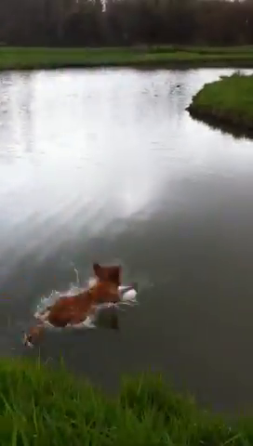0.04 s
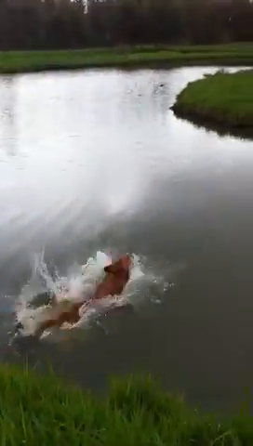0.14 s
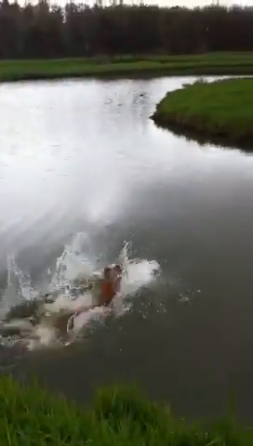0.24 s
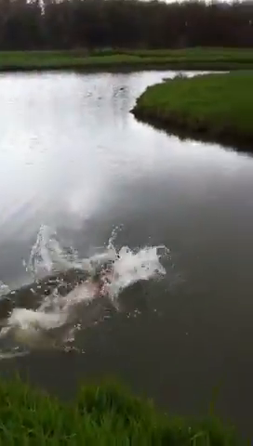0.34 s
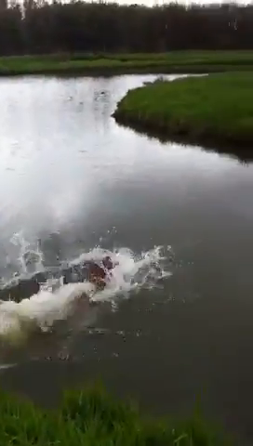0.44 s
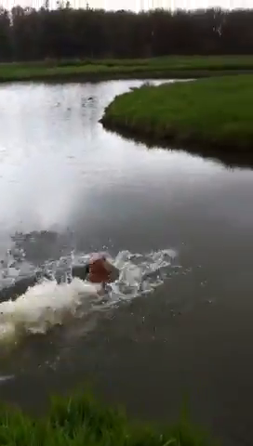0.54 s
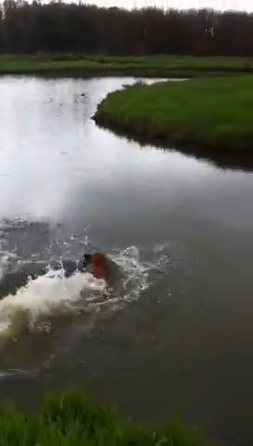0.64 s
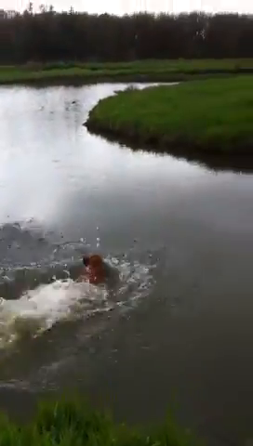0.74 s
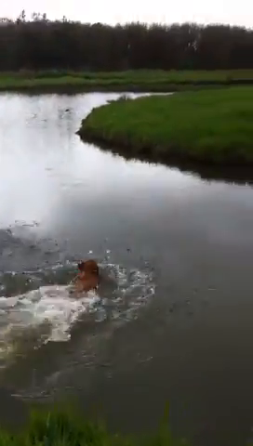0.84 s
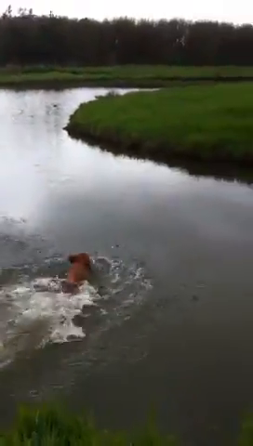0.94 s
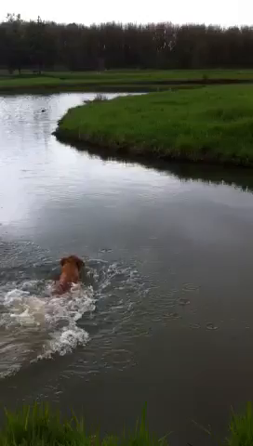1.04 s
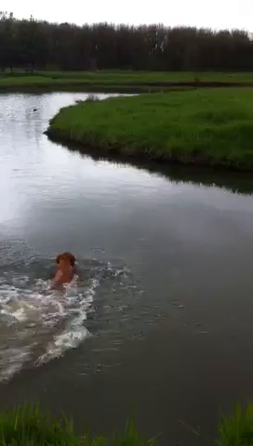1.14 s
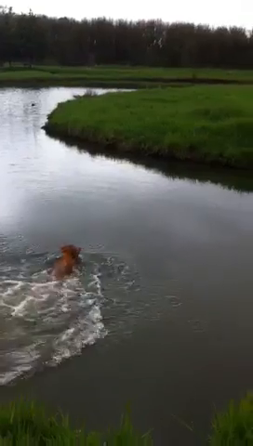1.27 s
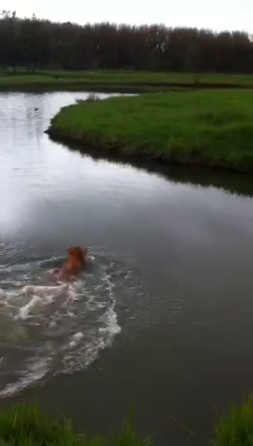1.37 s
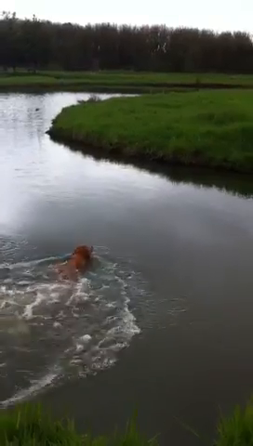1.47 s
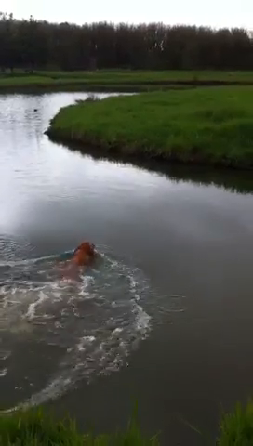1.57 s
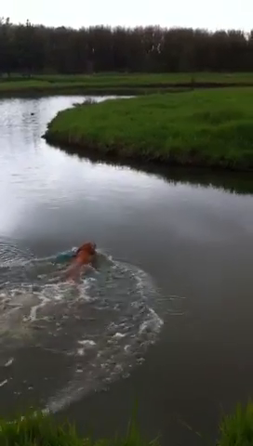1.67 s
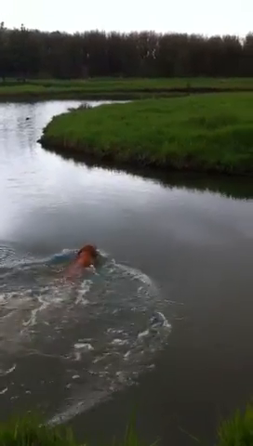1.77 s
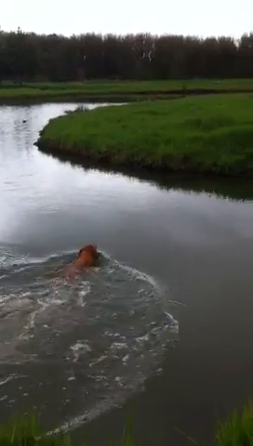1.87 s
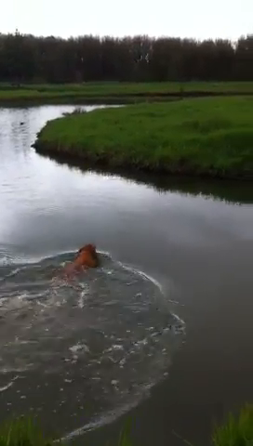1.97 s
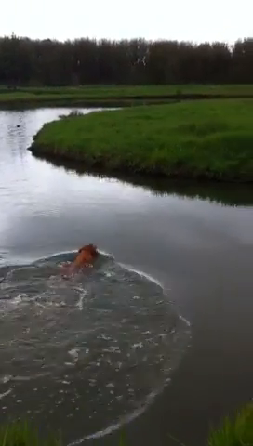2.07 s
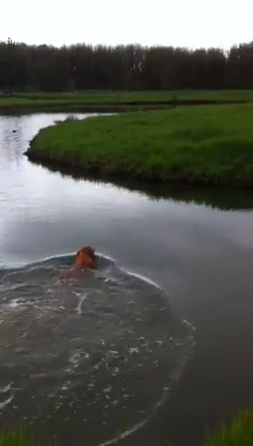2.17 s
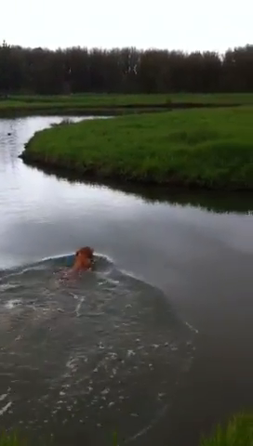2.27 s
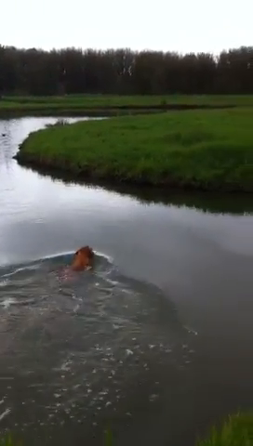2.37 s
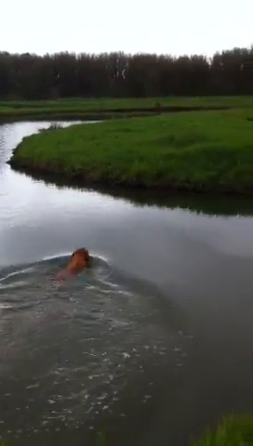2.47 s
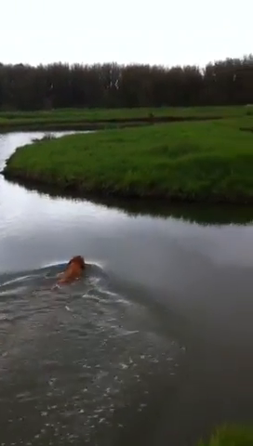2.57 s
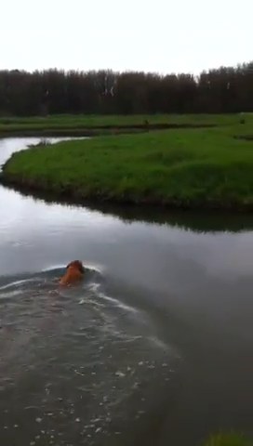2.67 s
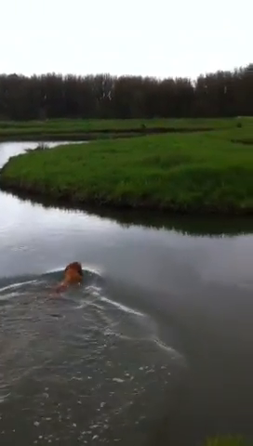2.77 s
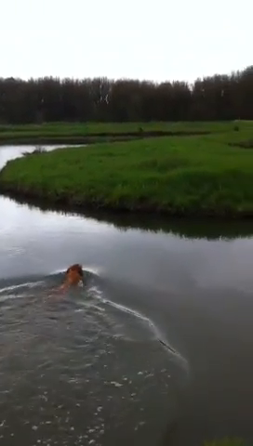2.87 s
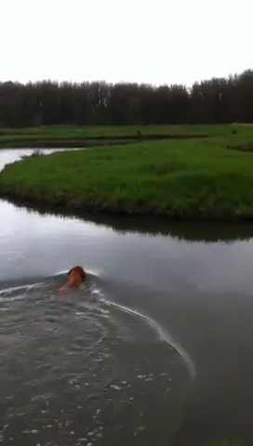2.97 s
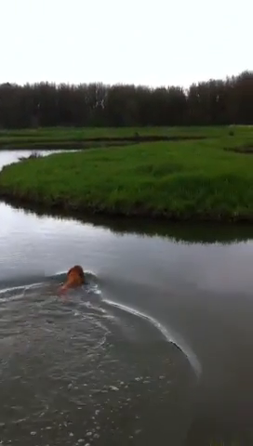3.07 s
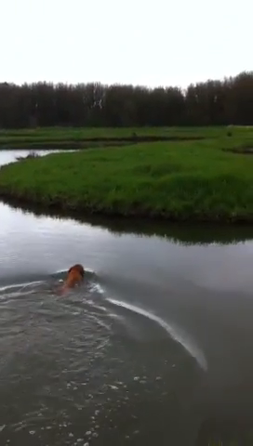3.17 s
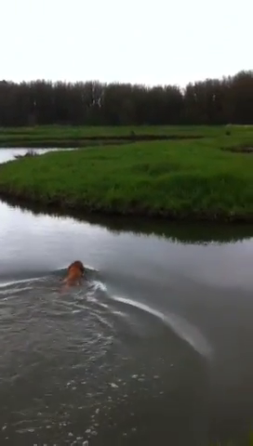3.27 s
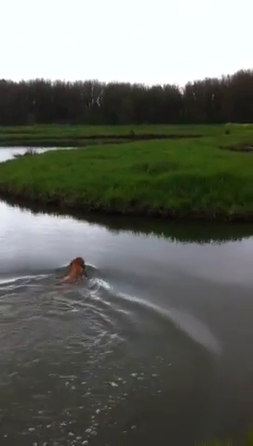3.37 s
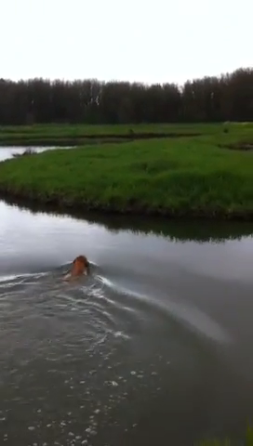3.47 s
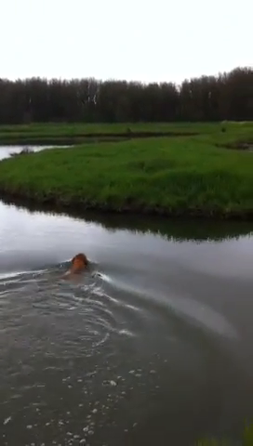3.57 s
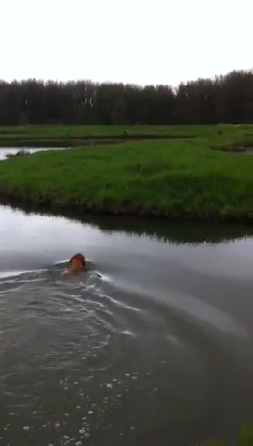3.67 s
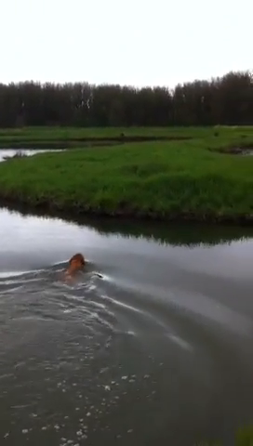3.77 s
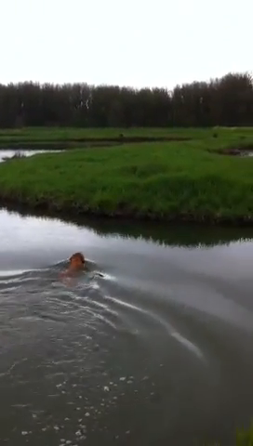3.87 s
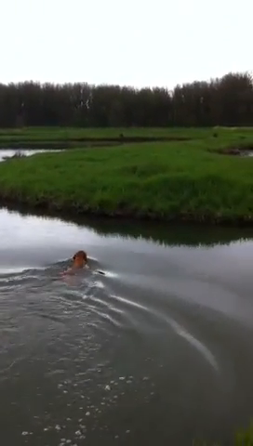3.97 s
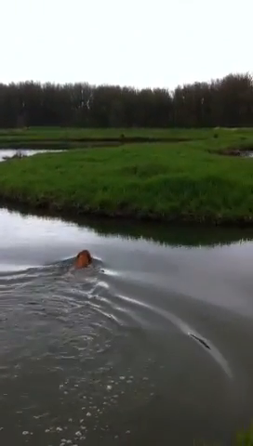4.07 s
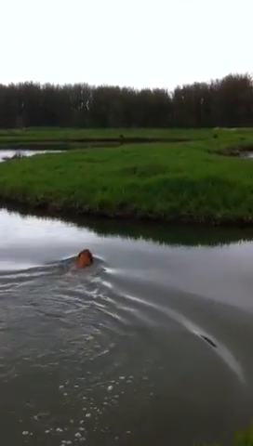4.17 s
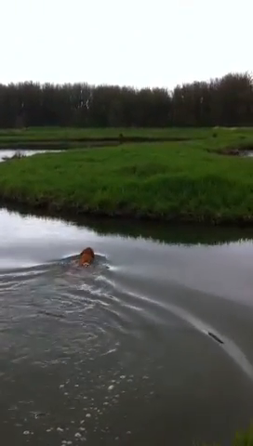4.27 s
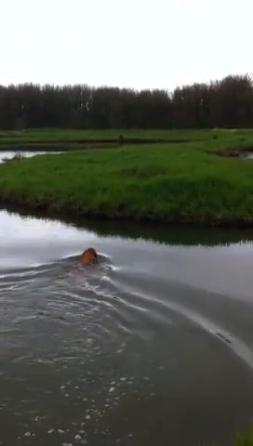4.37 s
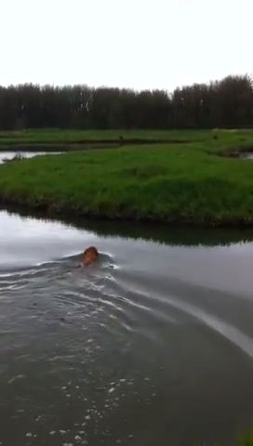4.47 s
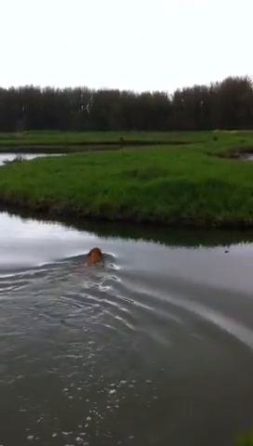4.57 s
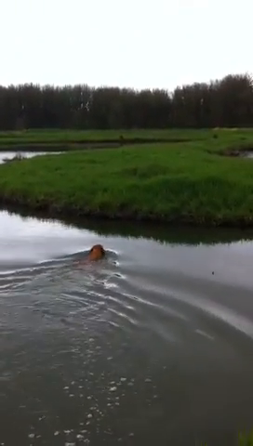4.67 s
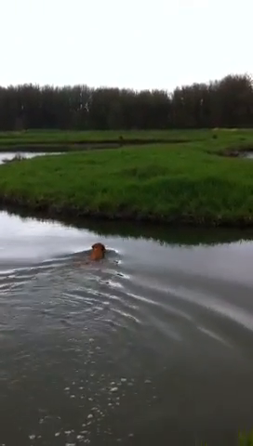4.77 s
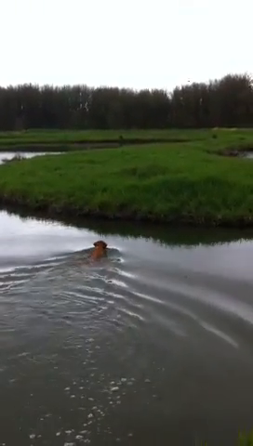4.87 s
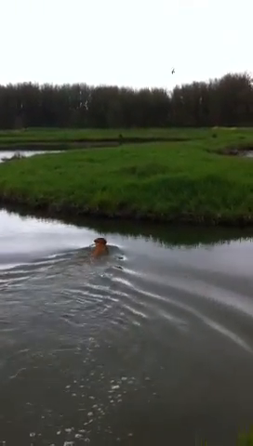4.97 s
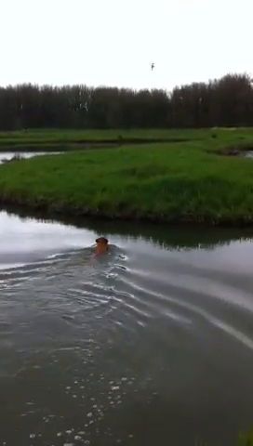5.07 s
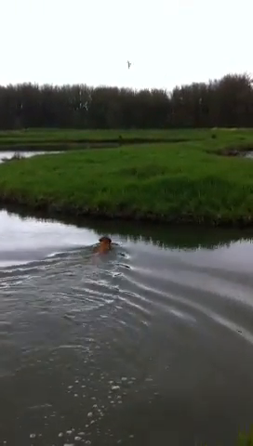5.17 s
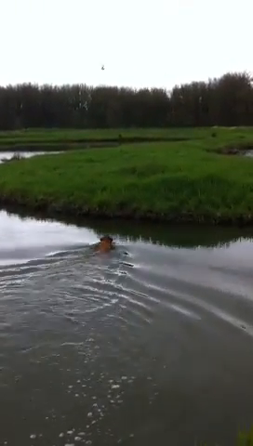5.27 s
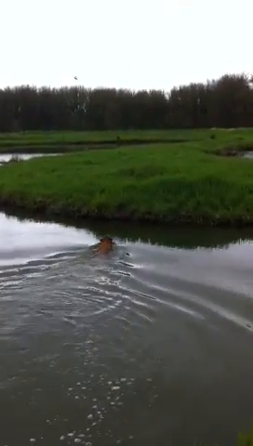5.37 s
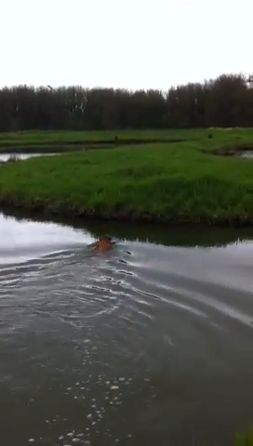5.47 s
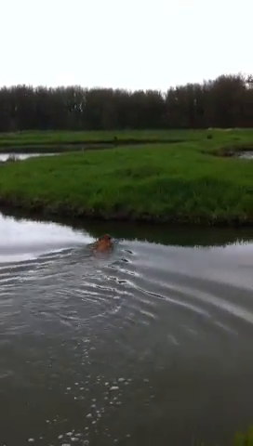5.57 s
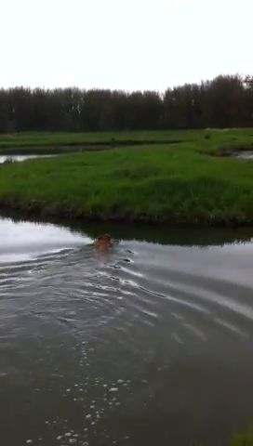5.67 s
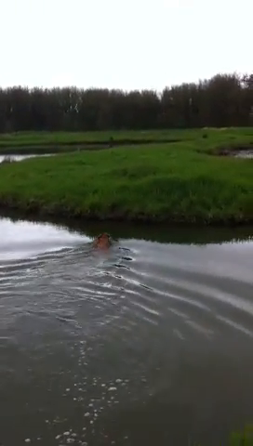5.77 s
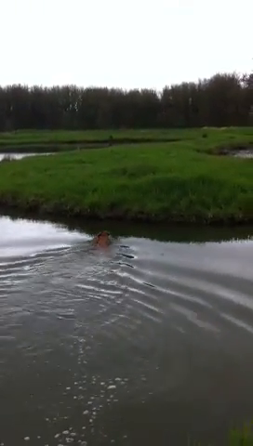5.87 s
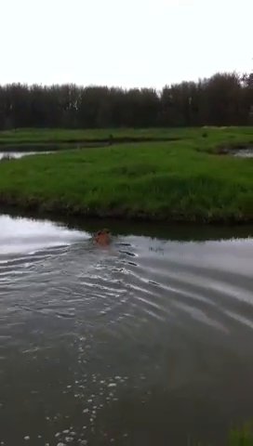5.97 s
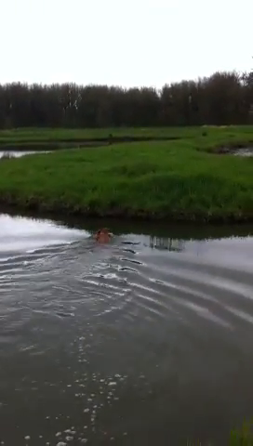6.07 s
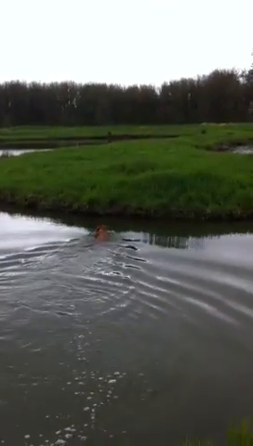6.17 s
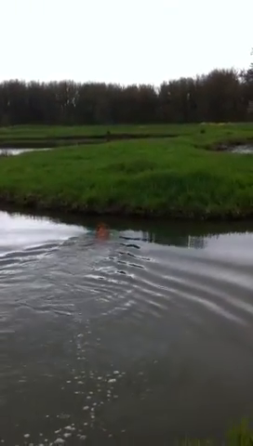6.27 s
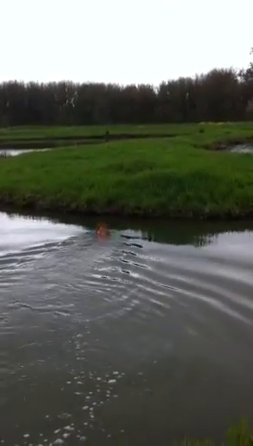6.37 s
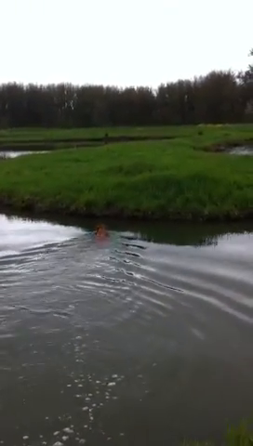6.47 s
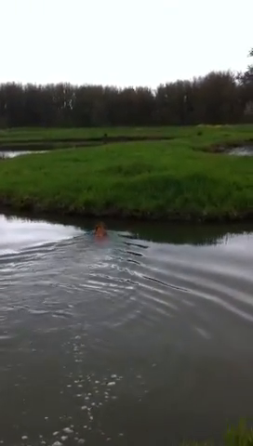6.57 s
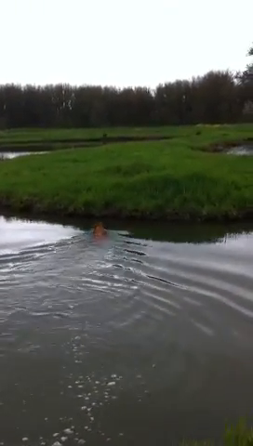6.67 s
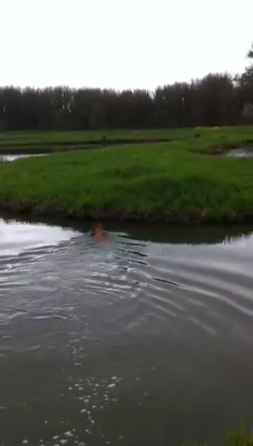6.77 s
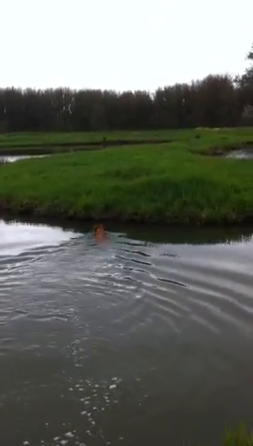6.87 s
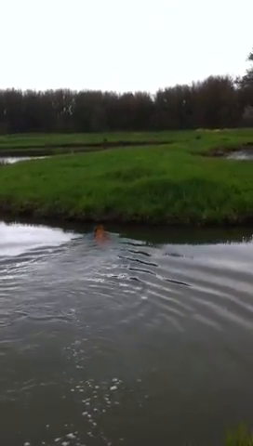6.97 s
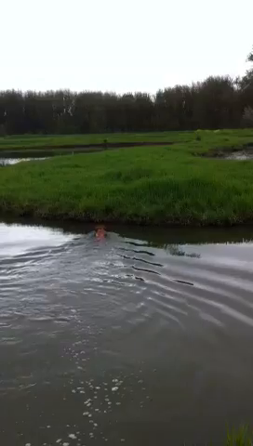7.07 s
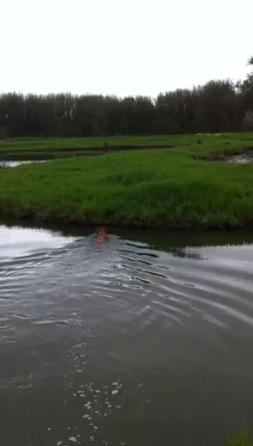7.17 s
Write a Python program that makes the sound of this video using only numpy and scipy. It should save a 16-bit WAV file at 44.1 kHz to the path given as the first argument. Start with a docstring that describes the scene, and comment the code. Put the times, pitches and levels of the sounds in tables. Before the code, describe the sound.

A hard crack of paws on water opens into a churning splash with low, hollow bubble booms. The splash thins over a second or two into fizz and falling drops. Light swimming follows, with small rising bubble plops, ticks and soft trickling moving away from the bank. A faint, very high whistle passes near two seconds; clear bird notes come after six. Open air, dull far road drone, one small mono microphone.

```python
"""Over a far road's drone (filtered noise, throughout) a dog leaps into a pond: paws slap the surface (noise bursts).
The body drags a cavity of air under, which booms and gulps (damped sines, noise); spray rains back, foam fizzes out.
A thin two-voiced whistle (gliding sines) passes as the dog paddles off with ticks (noise bursts), plops (damped
sines) and trickling water; songbirds (gliding sines with a diffuse echo) call from the trees, mostly at the end."""
import sys
import numpy as np
from scipy import signal
from scipy.fft import rfft, irfft, next_fast_len
from scipy.io import wavfile
from scipy.ndimage import map_coordinates

SR = 44100
rng = np.random.default_rng(int(sys.argv[2]) if len(sys.argv) > 2 else 0)


def dump_mix(stems):
    """Bounce the given channels to the path in sys.argv[1] as a 16-bit WAV at rate SR."""
    frames = np.atleast_2d(stems).T  # one column per channel
    limited = np.clip(frames, -1, 1)  # hard clip at full scale
    pcm = np.round(limited * 32767).astype(np.int16)
    wavfile.write(sys.argv[1], SR, pcm)


def linear_from_db(decibels):
    """Turn decibels (scalar or array-like) into linear amplitude factors; 0 gives 1."""
    return 10 ** (np.asarray(decibels, float) / 20)


N = 318731
RECEDE_DB_PER_S = 1.1  # the swimmer moves off


def unit(x):
    """Scaled to rms 1."""
    return x / np.sqrt(np.mean(x ** 2) + 1e-20)


def curves(rows, before=-120):
    """One value per sample for each column after the time; the last row holds."""
    s, *columns = np.transpose(rows)
    t = np.arange(N) / SR
    return [np.interp(t, s, column, left=before) for column in columns]


def wobble(rate_hz):
    """A smooth random curve, rate_hz knots a second."""
    knots = rng.standard_normal(int(N * rate_hz / SR) + 4)
    return map_coordinates(knots, [np.arange(N) * rate_hz / SR])


def coloured(x, spectrum):
    """x filtered through (f/Hz, level/dB) points on a log frequency axis, rms 1."""
    size = next_fast_len(N + 8192)
    hz, db = np.transpose(spectrum)
    bins_hz = np.fft.rfftfreq(size, 1 / SR) + 1
    gain = linear_from_db(np.interp(np.log(bins_hz), np.log(hz), db))
    return unit(irfft(rfft(x, size) * gain, size)[:N])


def crackle(per_s, spread_db, life_ms, share):
    """Water drops: white noise mixed with sudden noise bursts of uneven size that die away."""
    draw = rng.random((2, N))
    sizes = linear_from_db(-spread_db * np.log(draw[1] + .003))
    starts = (draw[0] < per_s / SR) * sizes
    bursts = signal.lfilter([1], [1, -np.exp(-1000 / (SR * life_ms))], starts)
    share = np.clip(share, 0, 1)  # power fraction of the bursts
    noise = rng.standard_normal((2, N))
    return np.sqrt(share) * unit(bursts * noise[0]) + np.sqrt(1 - share) * noise[1]


def bubbles(s, hz, db, cycles, rise):
    """Damped sines that start softly and climb in pitch as they near the surface."""
    t = np.arange(SR // 20)[None] / SR
    decays = hz[:, None] * t / cycles  # elapsed time over decay time
    envelope = (1 - np.exp(-8 * decays)) * np.exp(-decays)
    ring = envelope * np.sin(2 * np.pi * hz[:, None] * t * (1 + rise * decays))
    ring = ring * np.cos(np.pi / 2 * t / t.max())  # ends without a step
    at = (s[:, None] * SR).astype(int) + np.arange(t.size)
    return np.bincount(at.ravel(), (linear_from_db(db)[:, None] * ring).ravel(), N + SR)[:N]


def swarm(per_s, mid_hz, octaves, cycles):
    """A steady cloud of bubbles with log-normal pitches, rms 1."""
    draw = rng.random((int(per_s * N / SR), 2))
    hz = mid_hz * 2 ** (octaves * rng.standard_normal(len(draw)))
    db = -2.5 * np.log(draw[:, 1] + 0.061)
    return unit(bubbles(draw[:, 0] * N / SR, np.clip(hz, 60, 15000), db, cycles, 0.033))


def tone(rows, waver):
    """A whistled sine that follows (t/s, f/Hz, level/dB) rows; its pitch wavers by a fraction."""
    s, hz, db = np.transpose(rows)
    t = np.arange(N) / SR
    edge = np.clip(np.minimum(t - s[0], s[-1] - t) / 0.0034, 0, 1)
    pitch_hz = np.interp(t, s, hz) * (1 + waver * wobble(99))
    phase = 2 * np.pi * np.cumsum(pitch_hz) / SR
    return np.sqrt(2) * edge * linear_from_db(np.interp(t, s, db)) * np.sin(phase)


def road():
    """Distant traffic: a steady drone and a rumble of filtered noise that slowly ease."""
    # drone colour: f/Hz, level/dB
    drone_colour = [(180, -32), (300, -11), (447, -10.5), (511, -3.5), (842, -2), (1360, -9.5), (2360, -24),
                    (2570, -28.5), (2880, -29), (9390, -34), (16000, -34.5)]
    # rumble colour: f/Hz, level/dB
    rumble_colour = [(15, -69), (25, -41), (32, -41), (47, -21.5), (96, -0.5), (178, 4), (255, -5),
                     (330, -12), (430, -38), (730, -120)]
    drone_db, rumble_db, eases_db_per_s = -52.5, -57.5, 0.17  # levels at the start
    eases_db = eases_db_per_s * np.arange(N) / SR
    drone_gain = linear_from_db(drone_db - eases_db + .6 * wobble(3))
    rumble_gain = linear_from_db(rumble_db - eases_db + .9 * wobble(3.9))
    drone = drone_gain * coloured(rng.standard_normal(N), drone_colour)
    return drone + rumble_gain * coloured(rng.standard_normal(N), rumble_colour)


def note(s, length_s, hz, glide_hz, db):
    """Pitch and level rows of one bird note: it slides in from above, swells, sags and rings out."""
    swell_s, swell_db, sag_db_per_s = .04, 13, 50
    scoop, scoop_s = .035, .013  # pitch excess as a fraction, and its decay time
    ring_drop_db, ring_db_per_s, ring_s = 10, 130, .06  # near trees carry the note on
    t = np.linspace(0, length_s, num=12)
    swell_s = np.minimum(swell_s, 0.79 * length_s)
    level_db = db - swell_db * np.clip(1 - t / swell_s, 0, 1) - sag_db_per_s * np.clip(t - swell_s, 0, 1)
    pitch_hz = hz * (1 + scoop * np.exp(-t / scoop_s)) + glide_hz * t / length_s
    rows = np.transpose([s + t, pitch_hz, level_db])
    ring = [rows[-1] + [late_s, 0, -ring_drop_db - ring_db_per_s * late_s] for late_s in (.008, ring_s)]
    return np.vstack([rows, ring])


def birds():
    """Sine notes from across the water, trailed by the trees' diffuse echo; high notes are hoarser."""
    # bird notes: t/s, length/s, f/Hz, glide/Hz, level/dB
    song = [(2.3, .04, 3720, 40, -66), (2.84, .06, 3880, -90, -66), (6.497, .056, 1836, -14, -49),
            (6.565, .03, 5270, 0, -67), (6.56, .035, 5580, 0, -69), (6.612, .048, 3095, -20, -47),
            (6.618, .025, 4650, 0, -72), (6.655, .05, 3520, -20, -72), (6.722, .17, 1815, 80, -51.5),
            (6.875, .045, 5460, 0, -74), (6.87, .055, 6080, 0, -72), (6.995, .06, 2200, -20, -66),
            (7.0, .055, 2420, 50, -69), (7.078, .15, 3700, 50, -70), (7.085, .11, 3080, 30, -72)]
    # one hooked chirp: t/s, f/Hz, level/dB
    hook = [(6.872, 4180, -72), (6.886, 4400, -65), (6.898, 4360, -66), (6.912, 3520, -74)]
    calls = np.zeros(N)
    for rows in [note(*row) for row in song] + [np.array(hook)]:
        waver = .003 * (rows[0, 1] / 3000) ** 2
        calls += tone(rows, waver) * linear_from_db(2.5 * wobble(70))
    t = np.arange(SR // 2) / SR
    echo = rng.standard_normal(len(t)) * linear_from_db(-60 * t / .7) * (t > .015)
    echo /= np.linalg.norm(echo)
    return calls + linear_from_db(-11.5) * signal.fftconvolve(calls, echo)[:N]


def whistle():
    """Two close, faint, slightly hoarse sines that rise and sink together."""
    # upper voice: t/s, f/Hz, level/dB
    upper = [(1.645, 10100, -74), (1.68, 11100, -68), (1.765, 11880, -65), (1.8, 11520, -64),
             (1.84, 11460, -65), (1.89, 11100, -70), (1.96, 10500, -64), (1.999, 10150, -65),
             (2.035, 9650, -74)]
    # lower voice under the upper: t/s, distance below/Hz, distance below/dB
    offsets = [(1.68, 800, -1), (1.8, 880, 3), (1.89, 780, 1), (2.035, 420, 8)]
    s, hz, db = np.transpose(upper)
    at, below_hz, below_db = np.transpose(offsets)
    lower = np.transpose([s, hz - np.interp(s, at, below_hz), db - np.interp(s, at, below_db)])
    return sum(tone(voice, waver=0.006) * linear_from_db(3 * wobble(60)) for voice in [upper, lower])


def foam():
    """Foam left on the water bursts: sparse crackle in noise, with tiny ringing bubbles."""
    # foam level: t/s, level/dB
    foam_levels = [(0.6, -73), (1.0, -59), (1.5, -70), (1.9, -59.5), (2.6, -66), (2.8, -63.5), (3.3, -65.5),
                   (3.45, -70), (4.6, -69.5), (6.0, -79), (7.23, -85)]
    # fizz colour: f/Hz, level/dB
    fizz_colour = [(1060, -1), (1800, -4), (3440, -10.5), (6470, -6), (7910, -9), (11500, -1.5),
                   (12600, -7), (15100, -8), (16000, -36)]
    fizz = coloured(crackle(80, spread_db=4.0, life_ms=1.0, share=0.055), fizz_colour)
    droplets = 0.2 * swarm(45, mid_hz=7000, octaves=0.65, cycles=3.3)
    return linear_from_db(curves(foam_levels)[0] + 0.26 * wobble(23.0)) * (fizz + droplets)


def trickle():
    """Water runs off each paw stroke, rising fast and draining slowly; the wake laps in between."""
    # paw strokes: t/s, level/dB
    strokes = [(1.72, -57), (2.33, -60.5), (2.7, -78), (2.91, -62), (3.5, -70), (4.0, -59), (4.28, -66),
               (4.6, -62.5), (4.87, -72), (5.07, -65), (5.74, -70), (6.29, -70)]
    # trickle colour: f/Hz, level/dB
    trickle_colour = [(900, -42), (1500, -1), (2300, 0), (4000, -9), (6000, -7.5), (10000, -17),
                      (16000, -44)]
    lift_s, drain_s, lapping_db = .025, .12, -74  # lapping level at time 0, before receding
    t = np.arange(N) / SR
    flow = linear_from_db(lapping_db - RECEDE_DB_PER_S * t) * (t > strokes[0][0])
    for at, db in strokes:
        pulse = np.exp(-np.abs(t - at) / np.where(t < at, lift_s, drain_s))
        flow = np.maximum(flow, linear_from_db(db) * pulse)
    ringing = 0.55 * swarm(200, mid_hz=2605, octaves=0.56, cycles=4.5)
    water = crackle(250, spread_db=3, life_ms=2.5, share=0.5) + ringing
    return flow * coloured(water, trickle_colour)


def plops():
    """Bubbles closing behind a paw ring as damped, rising sines."""
    # plops: t/s, level/dB, f/Hz
    plop_rows = [(1.43, -42, 900), (1.575, -45, 1970), (2.343, -37.5, 1350), (2.606, -44, 2020),
                 (2.695, -49, 2700), (2.909, -44.5, 2190), (2.895, -49, 3000), (3.15, -42, 1320),
                 (3.49, -51, 2570), (4.005, -48, 1900), (3.766, -47, 2380), (4.278, -47.5, 2070),
                 (4.565, -43, 1490), (4.581, -43, 1400), (4.87, -57, 3970), (5.09, -51, 2500)]
    s, db, hz = np.transpose(plop_rows)
    return bubbles(s, hz, db, cycles=6.2, rise=0.026)


def ticks():
    """Short noise bursts around their own pitch: mostly water drops, and a faint high click at 6.169 s."""
    # ticks, mostly water drops; the one at 6.169 s has no known cause: t/s, peak level/dB, centre f/Hz
    tick_rows = [(0.0304, -42, 11000), (0.587, -26.5, 9000), (1.0477, -32.5, 10000), (1.127, -36, 5500),
                 (1.1393, -30.5, 5700), (1.324, -32, 10900), (1.6226, -42.5, 2700), (1.74, -36, 5500),
                 (1.7918, -37.5, 3000), (2.332, -44, 3500), (2.3565, -45.5, 4000), (2.915, -44, 11500),
                 (3.035, -44, 6000), (3.4155, -51, 5000), (3.4923, -48, 4500), (3.505, -50, 5000),
                 (3.5694, -50, 2700), (3.698, -52, 4000), (3.766, -52, 9000), (4.007, -49, 4000),
                 (4.0393, -43, 2600), (4.06, -50, 3000), (4.174, -50, 6000), (4.2492, -50, 5700),
                 (4.475, -49, 3800), (4.581, -41, 2490), (4.6768, -54, 11000), (4.8697, -44.5, 3600),
                 (5.1516, -48, 5500), (5.235, -53, 8500), (5.4755, -52, 5700), (5.745, -47, 3605),
                 (6.169, -51.5, 13000), (6.294, -45, 3000), (6.4727, -50.5, 4500)]
    slope_db_per_octave, skirt_db = 11, -17  # fall to each side of the centre, down to a flat skirt
    # fainter ticks at random moments
    small_count, small_db, small_spread_db, small_hz, small_octaves = 36, -50, 2, 7000, .9
    out, t = np.zeros(N + SR), np.arange(512) / SR
    hz = np.fft.rfftfreq(len(t), 1 / SR) + 1
    envelope = (1 - np.exp(-t / 0.00027)) * np.exp(-t / 0.0017)
    when = rng.uniform(1, N / SR, small_count)
    chance = rng.standard_normal((small_count, 2))
    db_small = small_db - RECEDE_DB_PER_S * when + small_spread_db * chance[:, 0]
    hz_small = small_hz * 2 ** (small_octaves * chance[:, 1])
    for s, db, mid_hz in list(tick_rows) + list(zip(when, db_small, hz_small)):
        tilt_db = np.maximum(-slope_db_per_octave * np.abs(np.log2(hz / mid_hz)), skirt_db)
        tilt_db = tilt_db - 12 * (hz / 16000) ** 4
        gain = linear_from_db(tilt_db) * hz / (hz + 900)
        burst = envelope * irfft(rfft(rng.standard_normal(len(t))) * gain)
        out[round(s * SR):][:len(t)] += linear_from_db(db) * burst / np.abs(burst).max()
    return out[:N]


def cavity():
    """Large air pockets break off the cavity and boom one by one as damped, rising sines."""
    # air pockets: t/s, level/dB, f/Hz
    pockets = [(0.176, -34.5, 292), (0.216, -36, 445), (0.222, -38, 213), (0.28, -28.5, 591),
               (0.285, -33, 274), (0.305, -32, 172), (0.328, -28.5, 240), (0.351, -32.5, 366),
               (0.356, -37, 191), (0.436, -34, 230), (0.478, -31.5, 545), (0.489, -44, 189)]
    s, db, hz = np.transpose(pockets)
    return bubbles(s, hz, db, cycles=7, rise=.03)


def plunge():
    """Big bubbles gulp in the cavity, smaller ones churn, spray patters back."""
    # plunge: t/s, cavity gulp level/dB, churn level/dB, spray level/dB
    plunge_levels = [(0.09, -59, -53, -40), (0.1, -58, -52, -58), (0.118, -56, -49, -56),
                     (0.13, -51, -58, -39.5), (0.156, -48, -43, -38), (0.19, -48.5, -36, -38),
                     (0.24, -35.5, -39, -42.5), (0.268, -45, -40, -43), (0.36, -30, -39, -43.5),
                     (0.4, -42, -43, -42.5), (0.47, -47, -41, -44), (0.498, -42, -38, -38),
                     (0.52, -46, -42.5, -43.5), (0.6, -54, -43, -43), (0.75, -57, -44, -41.5),
                     (1.12, -65, -50.5, -49.5), (1.53, -72, -55.5, -58.5), (2.3, -84, -75, -71)]
    # gulp colour: f/Hz, level/dB
    gulp_colour = [(60, -45), (110, -18), (160, -1.5), (240, -3), (380, -6.5), (550, 0), (900, -50)]
    # churn colour: f/Hz, level/dB
    churn_colour = [(180, -24), (300, -7), (797, 2.5), (1190, -1), (1450, 1.5), (1970, -3.5), (3500, -12),
                    (4550, -40), (7700, -120)]
    # spray colour: f/Hz, level/dB
    spray_colour = [(1060, -25), (1800, -5.5), (2300, 0.5), (3350, -4.5), (3640, -4), (5640, -2),
                    (8280, -8), (10200, -1.5), (14700, -10), (16000, -13)]
    gulp_db, churn_db, spray_db = curves(plunge_levels)
    big = 0.4 * swarm(150, mid_hz=240, octaves=0.505, cycles=2.0)
    gulp = coloured(big + rng.standard_normal(N), gulp_colour)
    smaller = 0.3 * swarm(400, mid_hz=900, octaves=0.86, cycles=3.74)
    churn = coloured(smaller + crackle(730, spread_db=2.5, life_ms=2.9, share=0.45), churn_colour)
    patter = 0.35 * swarm(500, mid_hz=6530, octaves=.7, cycles=7.6)  # small drops ring as they land
    spray = coloured(crackle(760, spread_db=-0.7, life_ms=1.5, share=0.28) + patter, spray_colour)
    out = linear_from_db(gulp_db) * gulp
    out += linear_from_db(churn_db + 0.4 * wobble(25.15)) * churn
    return out + linear_from_db(spray_db + 0.99 * wobble(30.05)) * spray


def slaps():
    """Paws crack the surface: a sharp snap inside a noise burst of a few ms, droplets after it."""
    # first contacts of the paws: peak t/s, level before trims/dB, rise/ms, fall/ms
    contacts = [(0.0858, -13, 0.85, 1.1), (0.127, -24, 0.18, 3.1), (0.1436, -31, .3, 2)]
    # slap colour: f/Hz, level/dB
    slap_colour = [(200, -38), (500, -4), (2100, 2), (2700, -4), (3300, -12), (5200, 4), (7500, -13),
                   (10000, -7), (12500, -15), (15000, -12), (16000, -32)]
    t, envelope, clicks = np.arange(N) / SR, np.zeros(N), np.zeros(N)
    for s, db, rise_ms, fall_ms in contacts:
        late_ms = (t - s) * 1000
        away_ms = np.abs(late_ms)
        fall = np.exp(-away_ms / fall_ms) + 0.057 * np.exp(-away_ms / 12)  # droplets linger
        envelope += linear_from_db(db - 7) * np.where(late_ms < 0, np.exp(-away_ms / rise_ms), fall)
        clicks[round(s * SR)] = linear_from_db(db - 6)
    snap = coloured(clicks, slap_colour)
    burst = envelope * coloured(rng.standard_normal(N), slap_colour)
    return burst - snap * clicks.max() / snap.max()


def scene():
    """Everything reaches one microphone."""
    background = road() + birds() + whistle()
    swim = foam() + trickle() + plops() + ticks()
    return (background + swim + cavity() + plunge() + slaps())[None]


def band_limit(x):
    """A steep low-pass at the top of the band."""
    return signal.sosfilt(signal.butter(12, 16640, fs=SR, output="sos"), x)


def record(dry):
    """A small camera: a steep band limit on the mix."""
    top_hz = 15850
    limited = irfft(rfft(dry) * (np.fft.rfftfreq(N, 1 / SR) < top_hz), N)
    return band_limit(limited)


dry = scene()
out = record(dry)
dump_mix(out)
```